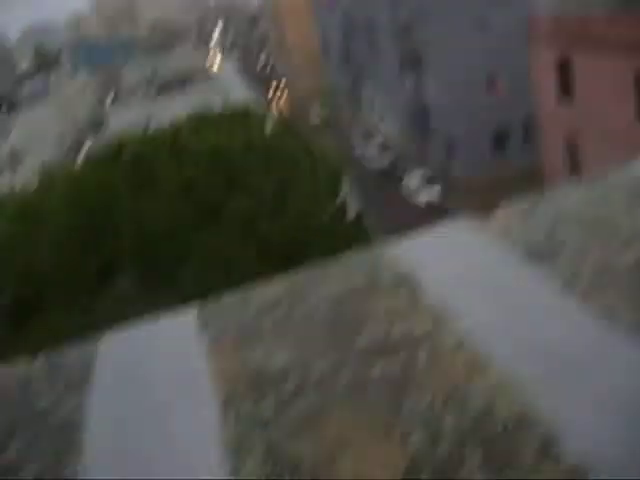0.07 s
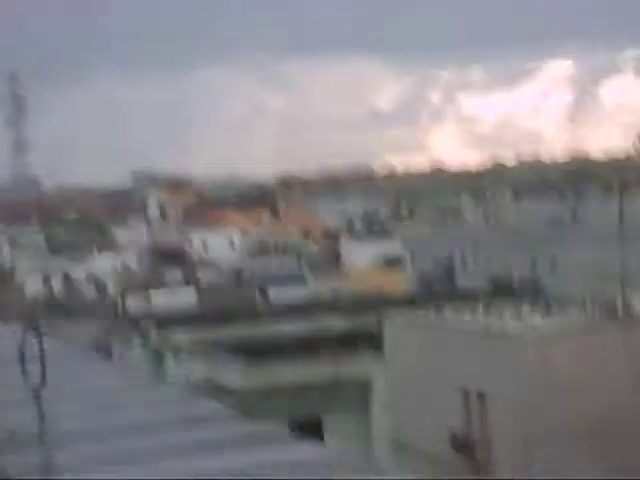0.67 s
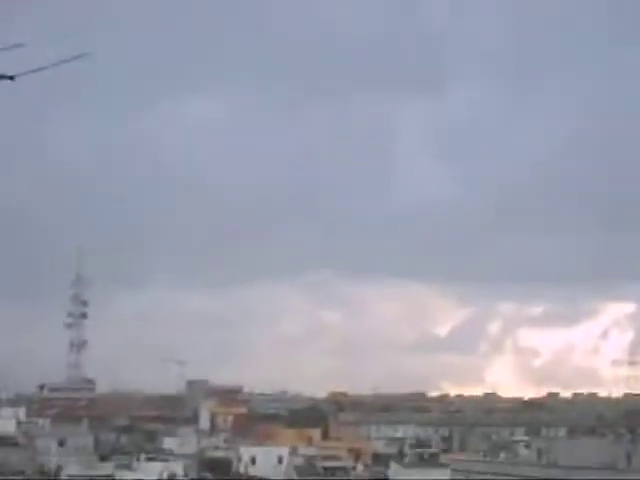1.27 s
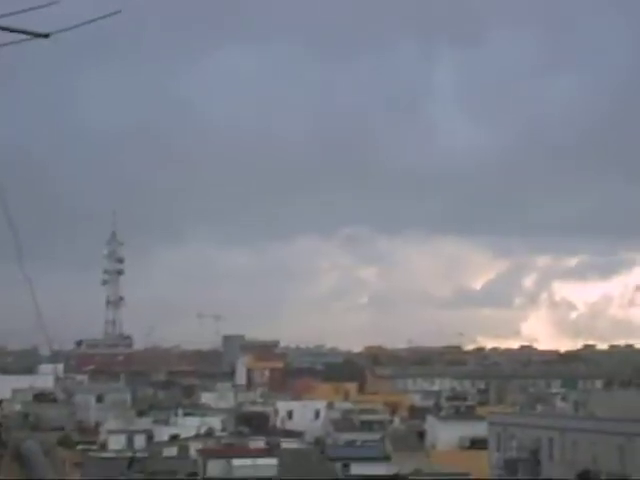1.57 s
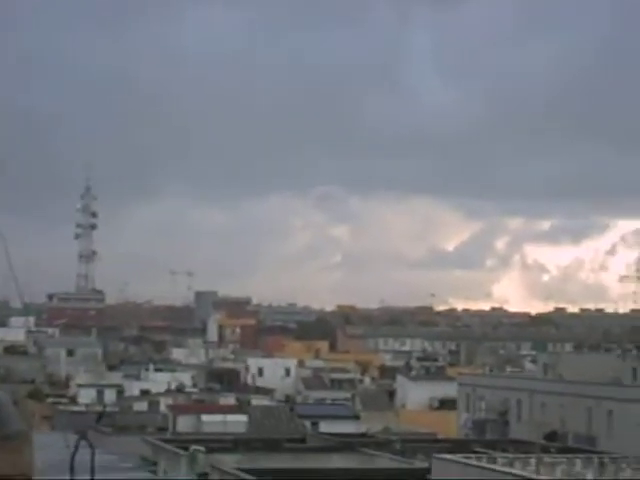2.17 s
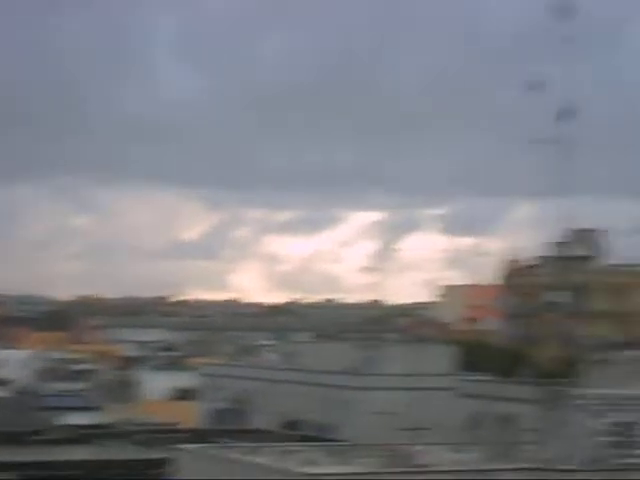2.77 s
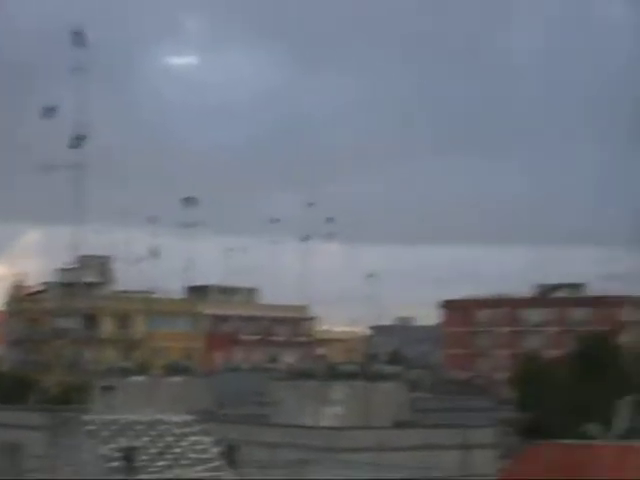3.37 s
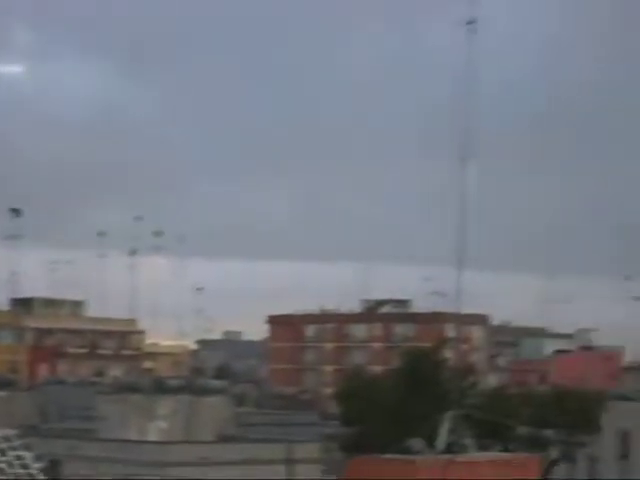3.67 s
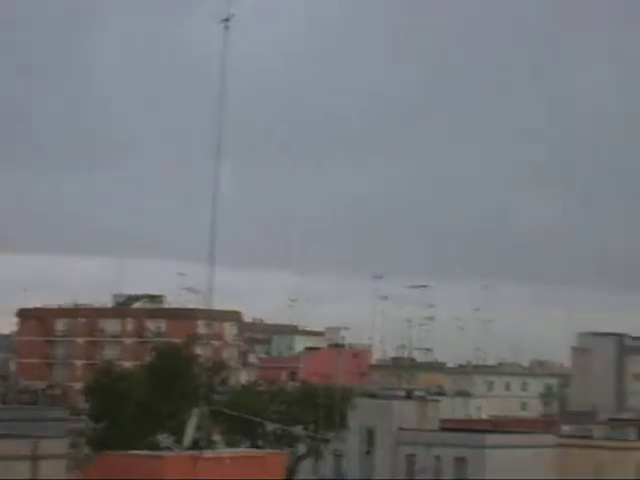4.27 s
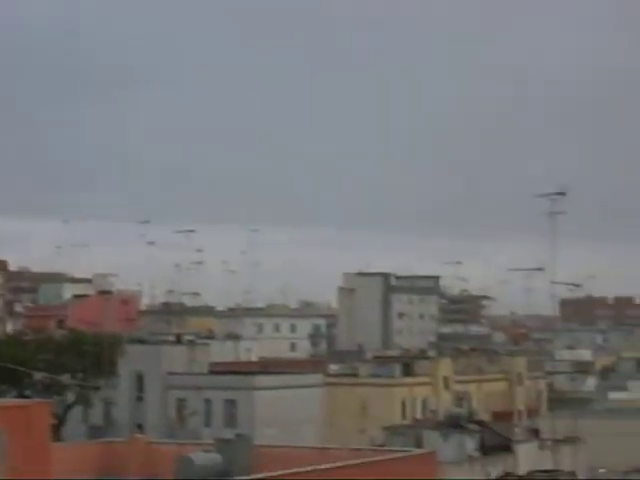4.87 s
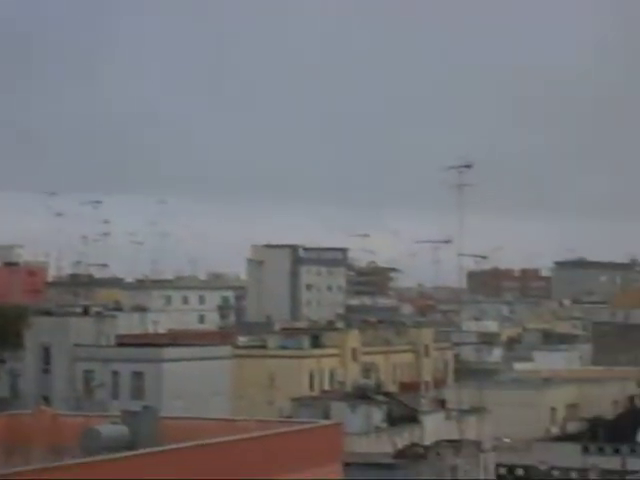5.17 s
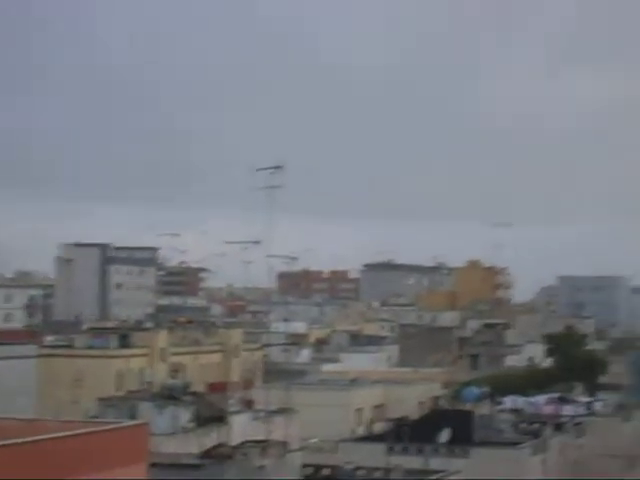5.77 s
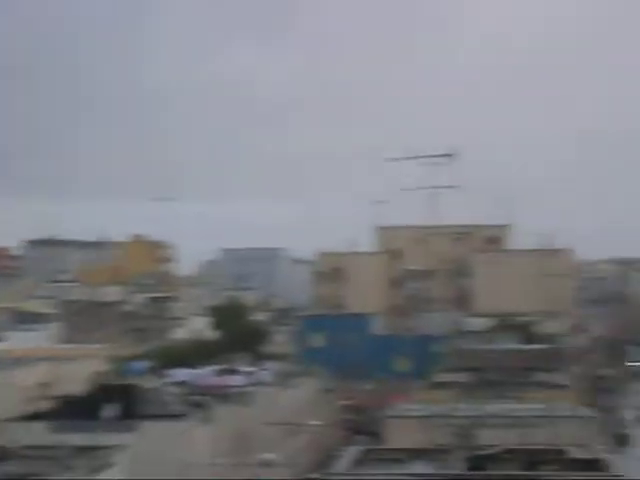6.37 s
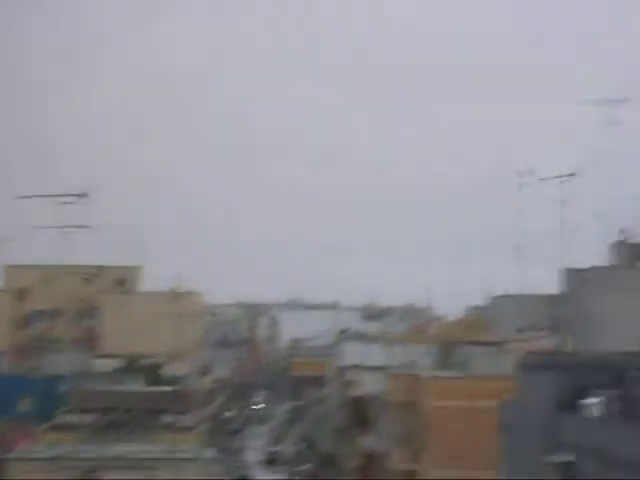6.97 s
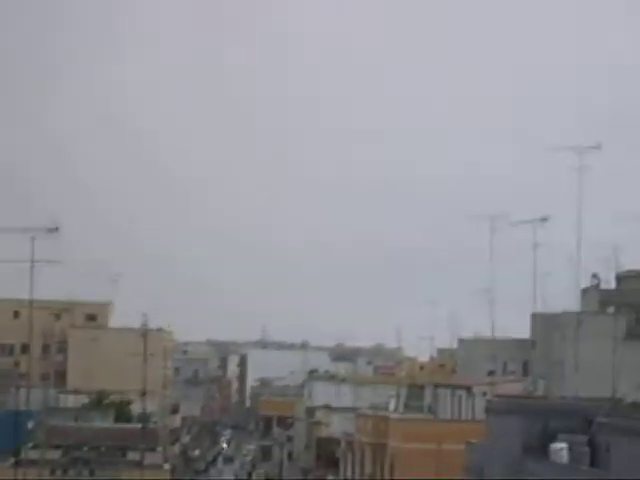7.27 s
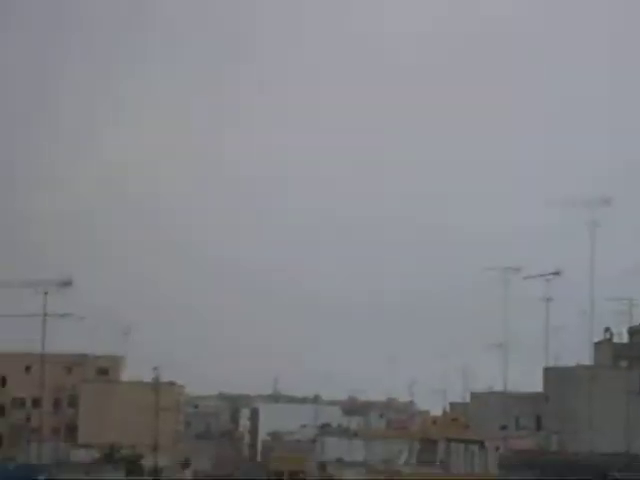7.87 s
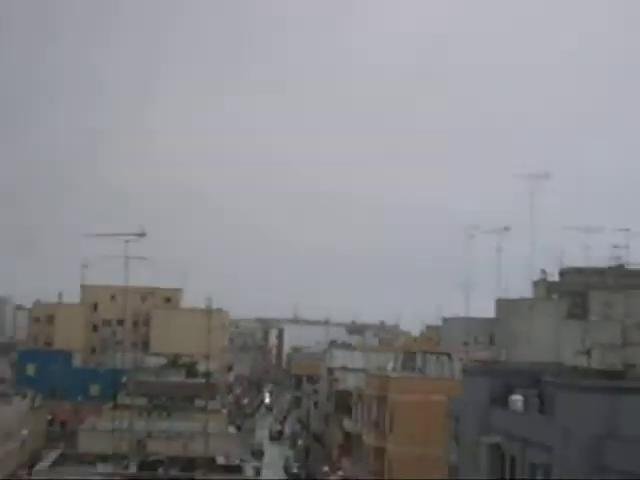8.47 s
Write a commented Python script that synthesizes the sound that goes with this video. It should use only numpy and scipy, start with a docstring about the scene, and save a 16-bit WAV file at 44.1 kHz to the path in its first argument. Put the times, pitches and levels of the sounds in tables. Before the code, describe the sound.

Hail and rain clatter close by, then hiss over town rooftops, with single stones clicking and wind buffeting the microphone.

```python
"""Hail and rain on a town, heard from a roof terrace through a small camera microphone.
Each stone clicks on masonry: one pressure swing, a chip of ice, then scatter from nearby surfaces.
A close clatter on the parapet cuts to a wide hiss over the roofs, with single stones and drops nearby.
Gusts and eddies buffet the microphone over a faint electronic whine, until the sound stops dead."""
import sys
import numpy as np
from scipy import signal
from scipy.fft import rfft, irfft
from scipy.io import wavfile

SR = 44100
rng = np.random.default_rng(int(sys.argv[2]) if len(sys.argv) > 2 else 0)


def dump(signal):
    """Clip the signal to [-1, 1] and save it as 16-bit WAV at the path in sys.argv[1]."""
    limited = np.clip(np.atleast_2d(signal).T, -1, 1)
    pcm = np.round(limited * 32767).astype(np.int16)
    wavfile.write(sys.argv[1], SR, pcm)


N = 376173
TIME_S = np.arange(N) / SR
CUT_S, STOP_S = 0.594, 7.940

# Loudest nearby hailstones. Each row: start in seconds, level in dB, brightness in Hz.
HAILSTONES = [(0.0098, -17, 2000), (0.0241, -18.5, 2330), (0.053, -19, 2100), (0.1236, -24, 1800),
              (0.1587, -21, 1300), (0.1875, -17, 1500), (0.192, -14.5, 2200), (0.286, -15.5, 1830),
              (0.3207, -23.5, 2400), (0.337, -20, 1300), (0.486, -25, 2400), (0.5074, -24, 1700),
              (0.5408, -20.5, 1500), (0.5748, -16.5, 2000), (0.6116, -30.5, 1900), (2.174, -33.5, 1700),
              (2.1821, -25, 1500), (2.997, -32, 1900), (3.206, -32, 2300), (3.3663, -33, 2500),
              (3.6012, -29.5, 2300), (3.861, -28, 1810), (4.0669, -31.5, 2700), (4.447, -30, 2100),
              (4.8699, -33.5, 1900), (4.9605, -34, 1800), (5.3579, -31, 2700), (5.595, -31, 1800),
              (6.193, -30, 2200), (6.5131, -34, 2400), (6.9331, -31, 3300), (7.4173, -33.5, 1900)]
# Wide shower, easing midway. Each row: time in seconds, level in dB.
SHOWER_LEVEL = [(0.6, -51.5), (2.3, -52.5), (3.3, -54), (4.3, -52.5), (7.9, -52.5)]
# Far impacts on the roofs. Each row: frequency in Hz, relative density in dB.
HISS_SPECTRUM = [(20, -13), (50, 9.5), (100, -1.5), (180, -3), (450, -3.5), (850, 0), (1500, -1),
                 (2500, -4), (4000, -10.5), (6000, -18.5), (10000, -27.5), (12000, -20.5)]
# Rain on the parapet. Each row: frequency in Hz, relative density in dB.
SPLASH_SPECTRUM = [(30, -10), (200, 12.5), (900, 6), (2000, -7), (4000, -15), (7000, -22), (12000, -19.5)]
# Wet surfaces sizzle when faced. Each row: time in seconds, level in dB relative to the shower.
SIZZLE_LEVEL = [(0.6, -20.5), (3.5, -22.5), (5.2, -20), (5.7, -14.5), (6.6, -15.5), (7.1, -23), (7.9, -10)]
# Drops near the microphone. Each row: start in seconds, level in dB.
DROP_TICKS = [(0.2572, -22), (3.036, -37), (4.1456, -36), (4.889, -36.5), (6.483, -37), (6.5624, -36),
              (7.5054, -31.5), (7.5903, -33), (7.8485, -19.5)]
# Gusts at the microphone. Each row: start of hold in seconds, hold in seconds, level in dB.
WIND_GUSTS = [(0.038, 0.072, -37.5), (0.174, 0.018, -40), (0.282, 0.077, -37.5), (0.418, 0.056, -39.5),
              (0.557, 0.017, -41), (0.77, 0.2, -53), (1.028, 0.46, -49.5), (2.602, 0.087, -56.5),
              (4.392, 0.061, -50), (4.524, 0.25, -45), (4.58, 0.088, -38), (4.979, 0.017, -50),
              (5.534, 0.26, -45), (5.864, 0.32, -54), (6.596, 0.21, -45.5), (7.092, 0.18, -48),
              (7.414, 0.019, -44), (7.527, 0.15, -43), (7.816, 0.1, -44)]
# Turbulence at the microphone. Each row: frequency in Hz, relative density in dB.
BUFFET_SPECTRUM = [(15, -14.5), (40, -3.5), (90, 2), (160, -1.5), (300, -4), (500, -11), (900, -27),
                   (2000, -40), (5000, -70.5)]
# Hardest eddies. Each row: centre in seconds, level in dB, nominal pitch in Hz.
HARD_EDDIES = [(0.038, -18, 260), (0.051, -15.5, 380), (0.278, -22.5, 430), (0.34, -19.5, 430),
               (0.424, -18, 189), (0.472, -20, 222), (0.59, -19, 390), (1.04, -31.5, 190),
               (1.092, -23.5, 181), (1.162, -24, 169), (1.315, -29.5, 248), (1.356, -30, 178),
               (4.39, -27, 330), (4.516, -28.5, 328), (4.637, -24, 242), (4.671, -26.5, 340),
               (5.544, -28, 139), (5.625, -31.5, 207), (5.693, -32, 169), (5.738, -29, 280),
               (6.657, -22.5, 213), (7.101, -29.5, 213), (7.25, -26.5, 177), (7.544, -22, 240),
               (7.555, -21.5, 208), (7.597, -27.5, 170), (7.645, -26.5, 180), (7.839, -23.5, 320),
               (7.932, -24.5, 280)]
# Camera whine. Each row: frequency in Hz, level in dB.
WHINE_TONES = [(8122, -80), (9869, -81)]


def hail_impact(hz, scatter, crack=0.12, size=1400):
    """One stone on masonry: a pressure swing, then scatter from surfaces around. Peak 1."""
    t = np.arange(size) / SR
    phase = 2 * np.pi * hz * t  # shorter contact, brighter click
    swing = -phase ** 2 * (3 - phase) * np.exp(-phase)
    swing += crack * rng.standard_normal(size) * np.exp(-t / 0.00053)  # ice chips on contact
    paths = rng.standard_normal(size) * (np.exp(-t / 0.0009) + 0.05 * np.exp(-t / 0.0079))
    paths *= scatter / np.linalg.norm(paths)
    paths[0] = 1  # direct path
    click = filtered(signal.fftconvolve(swing, paths)[:size], 480, "highpass")
    return click / abs(click).max()


def patter(per_s, hz, spread_db, scatter, kind_count=24):
    """Stones of many sizes fall at random; the few close ones stand out. Rms 1."""
    chance, weight, pitch, _ = rng.random((4, N))
    hits = np.flatnonzero(chance < per_s / SR)
    gains = amp(spread_db * np.minimum(-np.log(weight[hits]), 4))
    kinds = (pitch[hits] * kind_count).astype(int)
    out = np.zeros(N)
    for kind, ratio in enumerate(np.geomspace(0.55, 1.8, kind_count)):
        train = np.zeros(N)
        train[hits[kinds == kind]] = gains[kinds == kind]
        out += signal.oaconvolve(train, hail_impact(hz * ratio, scatter))[:N]
    return unit_rms(out)


def parapet_shower():
    """Dense hail on the ledge at the microphone, over the splash of rain."""
    clatter = amp(-41.5) * patter(per_s=650, hz=1900, spread_db=3, scatter=0.75)
    spray = amp(-53) * patter(per_s=260, hz=6900, spread_db=7.5, scatter=0.7)
    splash = amp(-41.5) * flurries(SPLASH_SPECTRUM, depth_db=1.5, rate_hz=28)
    splash *= amp(2 * waver(hz=60.05))
    return clatter + spray + splash


def town_shower():
    """Countless far impacts merge to a hiss; those on the terrace stay separate."""
    hiss = amp(-0.26) * flurries(HISS_SPECTRUM, depth_db=1.15, rate_hz=26)
    hiss *= amp(0.89 * waver(hz=28.4))
    terrace = amp(-5) * patter(per_s=420, hz=1900, spread_db=4, scatter=0.85)
    spray = amp(-21.5) * patter(per_s=70, hz=7900, spread_db=0, scatter=0.7)
    sizzle = unit_rms(filtered(rng.standard_normal(N), [3200, 7500], "bandpass", order=1))
    sizzle *= amp(curve(SIZZLE_LEVEL))
    return amp(curve(SHOWER_LEVEL)) * (hiss + terrace + spray + sizzle)


def flurries(spectrum_rows, depth_db, rate_hz, band_count=9):
    """Noise bands swell separately, as flurries cross surfaces of different pitch."""
    centres_hz = np.geomspace(400, 9000, band_count)
    log_hz = np.log(np.fft.rfftfreq(N, 1 / SR) + 1)
    spectrum, out = rfft(coloured_noise(spectrum_rows)), np.zeros(N)
    for share in np.eye(band_count):
        band = irfft(spectrum * np.interp(log_hz, np.log(centres_hz), share), N)
        out += band * amp(depth_db * waver(rate_hz))
    return unit_rms(out)


def loud_stones(fragments=3):
    """Nearby stones, each with its own contact time; their fragments land just after."""
    out = np.zeros(N)
    for start_s, db, hz in HAILSTONES:
        add(out, start_s, amp(db) * hail_impact(hz, scatter=0.82))
        for delay, loss, pitch in rng.random((fragments, 3)):
            fragment = hail_impact(hz * (0.6 + 0.6 * pitch), scatter=0.38)
            add(out, start_s + 0.002 + 0.012 * delay, amp(db - 10.5 - 9 * loss) * fragment)
    return out


def light_stones(per_s=4, level_db=-37, spread_db=2, centre_hz=2000):
    """Small stones of like size strike the terrace at random."""
    out = np.zeros(N)
    for when, weight, pitch in rng.random((round(per_s * STOP_S), 3)):
        db = level_db + spread_db * (2 * weight - 1)
        add(out, when * STOP_S, amp(db) * hail_impact(centre_hz * 2 ** (pitch - 0.5), scatter=1))
    return out


def drop_ticks(decay_s=0.0011, size=500):
    """Drops burst close by in a brief bright fizz."""
    out, t = np.zeros(N), np.arange(size) / SR
    for start_s, db in DROP_TICKS:
        burst = filtered(rng.standard_normal(size) * np.exp(-t / decay_s), 3020, "highpass", order=1)
        add(out, start_s, amp(db) * burst / abs(burst).max())
    return out


def gust_level_db(rise_s=0.019, fall_s=0.025, breeze_db=-68.5):
    """Each gust builds, holds and dies away, over a light breeze."""
    power = amp(breeze_db) ** 2
    for start_s, hold_s, db in WIND_GUSTS:
        before = np.maximum(start_s - TIME_S, 0) / rise_s
        after = np.maximum(TIME_S - start_s - hold_s, 0) / fall_s
        envelope = np.exp(-np.minimum(before + after, 20))
        power = power + (amp(db) * envelope) ** 2
    return 10 * np.log10(power)


def wind_buffet(wind_db):
    """Lumpy turbulence at the microphone; harder gusts make smaller, higher eddies."""
    flow = coloured_noise(BUFFET_SPECTRUM) * amp(3.6 * waver(hz=45))
    force = np.clip((wind_db + 52.5) / 17, 0, 1)
    lull = filtered(flow, 150, "lowpass", order=1)
    return amp(wind_db - 0.5) * unit_rms(lull + force * (flow - lull))


def small_eddies(wind_db, per_s=22, boost_db=5, centre_hz=202):
    """Random eddies scale with the gust that carries them. Rows as in HARD_EDDIES."""
    rows = []
    for when, weight, pitch in rng.random((round(per_s * STOP_S), 3)):
        centre_s = when * STOP_S
        db = wind_db[int(centre_s * SR)] + boost_db + 7 * (weight - 0.5)
        rows.append((centre_s, db, centre_hz * 2 ** (pitch - 0.5)))
    return rows


def eddy_thumps(wind_db, size=1800):
    """Each eddy shoves the diaphragm once, with a smaller uneven swing before and after."""
    out, t = np.zeros(N), (np.arange(size) - size / 2) / SR
    for centre_s, db, hz in HARD_EDDIES + small_eddies(wind_db):
        wobble = unit_rms(filtered(rng.standard_normal(size), 270, "lowpass"))
        cycles = np.cumsum(hz * np.exp(0.47 * wobble - 0.15)) / SR
        cycles -= cycles[size // 2]
        shove = np.cos(2 * np.pi * cycles) / np.cosh(cycles / 0.35)
        add(out, centre_s + t[0], amp(db - 0.5) * rng.choice([-1, 1]) * shove)
    return filtered(out, 78, "highpass", order=1)


def camera_whine():
    """Thin steady tones from the electronics."""
    return sum(amp(db) * np.sin(2 * np.pi * hz * TIME_S) for hz, db in WHINE_TONES)


def coloured_noise(spectrum_rows):
    """Noise shaped by (Hz, dB) rows. Rms 1."""
    hz, db = np.transpose(spectrum_rows)
    bins_hz = np.fft.rfftfreq(N, 1 / SR)
    gains = amp(np.interp(np.log(bins_hz + 1), np.log(hz), db))
    return unit_rms(irfft(rfft(rng.standard_normal(N)) * gains, N))


def waver(hz, size=8192):
    """Random motion up to about hz. Rms 1."""
    bins_hz = np.fft.rfftfreq(size, TIME_S[-1] / size)
    motion = unit_rms(irfft(rfft(rng.standard_normal(size)) / (1 + (bins_hz / hz) ** 4)))
    return np.interp(TIME_S, np.linspace(0, TIME_S[-1], size), motion)


def filtered(x, hz, kind, order=2):
    """Butterworth filter."""
    return signal.sosfilt(signal.butter(order, hz, kind, fs=SR, output="sos"), x)


def amp(db):
    """Decibels to gain."""
    return 10 ** (np.asarray(db) / 20)


def unit_rms(x):
    """Scales to rms 1."""
    return x / np.sqrt(np.mean(x ** 2) + 1e-20)


def curve(rows):
    """Joins (seconds, value) rows by straight lines."""
    return np.interp(TIME_S, *np.transpose(rows))


def add(mix, start_s, sound):
    """Mixes a sound in at start_s."""
    part = mix[max(round(start_s * SR), 0):][:len(sound)]
    part += sound[:len(part)]


def scene():
    """The close shower cuts to the wide one; stones and wind run through both. Mono."""
    shower = np.where(TIME_S < CUT_S, parapet_shower(), town_shower())
    nearby = loud_stones() + drop_ticks()
    wind_db = gust_level_db()
    wind = wind_buffet(wind_db) + eddy_thumps(wind_db)
    return (shower + nearby + wind + light_stones() + camera_whine())[None]


def record(dry, rolloff_hz=9920, edge_hz=12400):
    """The camera dulls the top octave, stops abruptly and limits the band."""
    dull = filtered(dry, rolloff_hz, "lowpass", order=10) * (TIME_S < STOP_S)
    band_limit = signal.firwin(301, edge_hz, window=("kaiser", 9), fs=SR)
    return signal.oaconvolve(dull, band_limit[None], "same")


dry = scene()
out = record(dry)
dump(out)
```